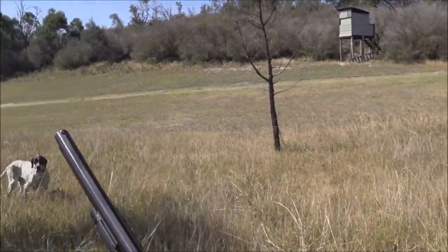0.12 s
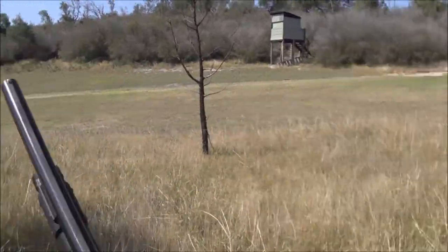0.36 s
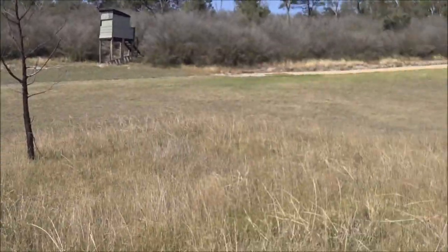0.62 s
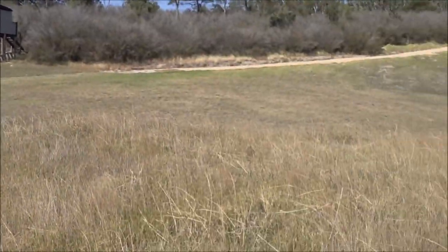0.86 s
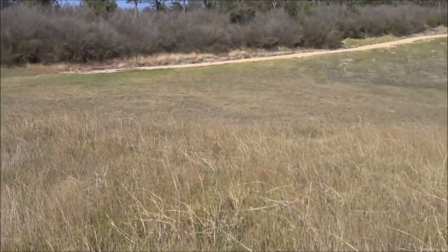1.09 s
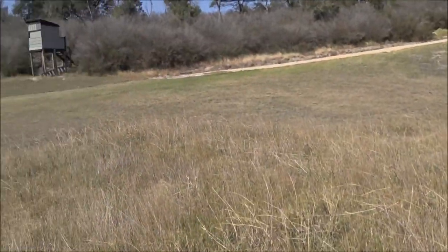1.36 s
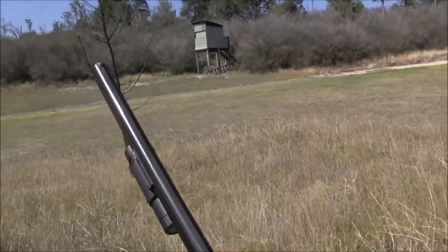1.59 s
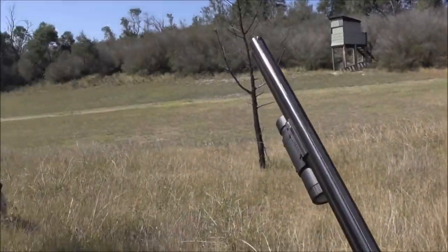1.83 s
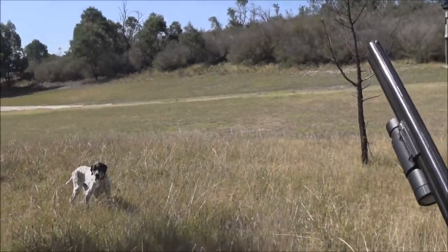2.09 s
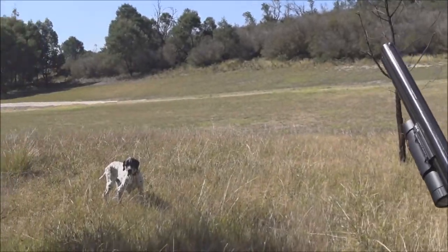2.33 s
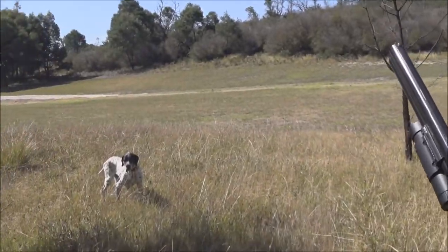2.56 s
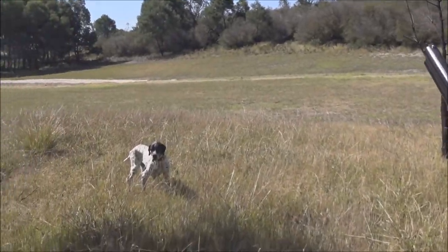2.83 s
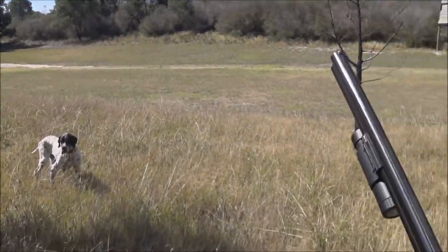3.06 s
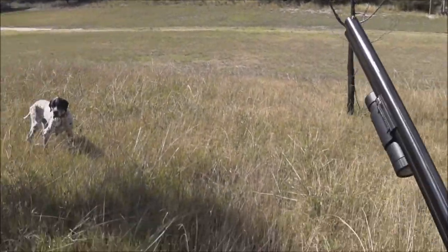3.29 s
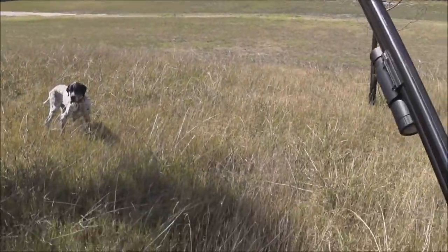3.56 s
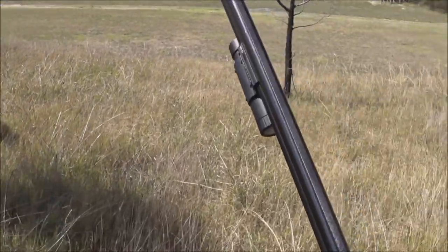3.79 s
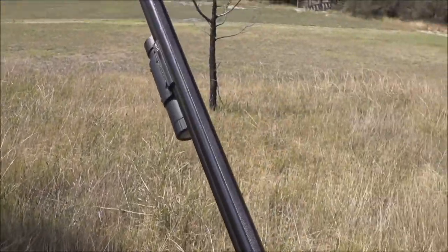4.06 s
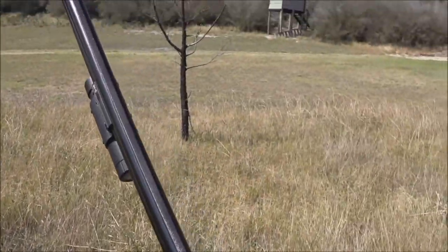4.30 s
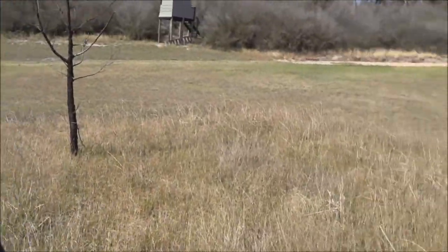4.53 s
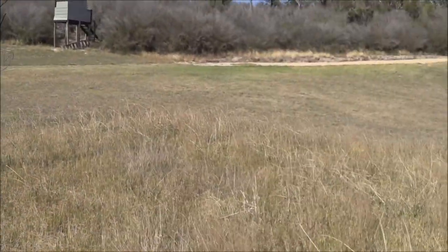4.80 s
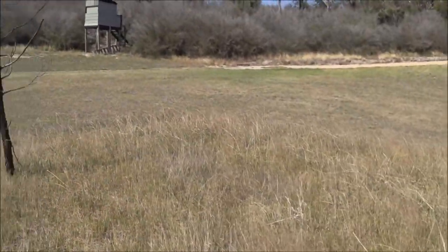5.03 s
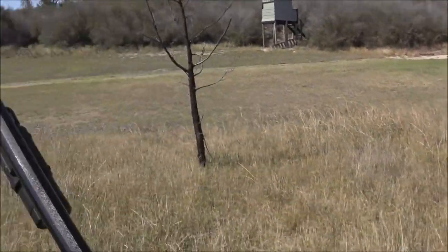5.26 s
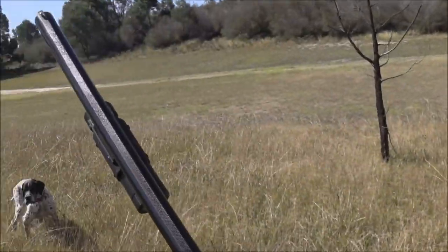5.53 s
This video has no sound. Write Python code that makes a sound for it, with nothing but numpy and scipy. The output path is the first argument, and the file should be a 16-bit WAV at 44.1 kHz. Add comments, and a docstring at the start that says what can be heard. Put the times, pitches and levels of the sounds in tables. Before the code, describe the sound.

Uneven dry grass rustling outdoors, loud low wind thumps near the start, a weaker gust later, thin insect trills and a sharp twig-like click.

```python
"""Legs brush through tall dry grass on a breezy hillside, heard by a head-worn stereo camera.
The grass is filtered noise and tiny clicks, over the steady low noise of the microphone capsules.
Wind thumps on two ports are summed wave packets and deep noise; stalks pop as single wave packets.
Trains of high insect chirps are gated tones, stem snaps are noise bursts rung through resonances,
and one brief faint hum is a sine."""
import sys
import numpy as np
from scipy import signal
from scipy.fft import rfft, irfft, next_fast_len
from scipy.io import wavfile
from scipy.ndimage import uniform_filter1d, minimum_filter1d, map_coordinates

SR = 44100
rng = np.random.default_rng(int(sys.argv[2]) if len(sys.argv) > 2 else 0)


def invert_db(level):
    """Linear amplitude ratio for a level in decibels (20 dB per decade), elementwise."""
    return 10 ** (np.asarray(level, dtype=float) / 20)


def pcm_store(signal):
    """Save signal as 16-bit PCM."""
    levels = np.round(np.clip(np.atleast_2d(signal), -1, 1) * 32767)
    wavfile.write(sys.argv[1], SR, levels.astype(np.int16).T)


N = 248724


def unit(x):
    """Normalisation: scales a signal to an rms of 1."""
    return x / np.sqrt(np.mean(x ** 2) + 1e-20)


def along(points, hz):
    """Spectral interpolation: reads (frequency, value) points on a logarithmic frequency axis."""
    point_hz, value = np.transpose(points)
    return np.interp(np.log(hz + 1), np.log(point_hz + 1), value)


def curves(rows):
    """Linear interpolation in time: one curve for each column after the time."""
    s, *columns = np.transpose(rows)
    return [np.interp(np.arange(N) / SR, s, column) for column in columns]


def wobble(rate):
    """Slow random modulation: a smooth curve through `rate` random knots a second."""
    knots = rng.standard_normal(int(N * rate / SR) + 4)
    return map_coordinates(knots, [np.arange(N) * rate / SR])


def filtered(x, response):
    """Linear filtering: the spectrum of x is multiplied by a response of frequency."""
    m = next_fast_len(N + 8192)
    return irfft(rfft(x, m) * response(np.fft.rfftfreq(m, 1 / SR)), m)[..., :N]


def wavelets(s, gain, hz, cycles, phase):
    """Superposition of short wave packets centred on times s; each rises faster than it fades."""
    k = np.arange(-300, 501)
    turns = hz[:, None] * k / SR
    span = np.where(k < 0, 0.54 * cycles, cycles)
    carrier = np.cos(2 * np.pi * turns + phase[:, None])
    wave = gain[:, None] * carrier / (1 + (turns / span) ** 2) ** 2
    wave *= signal.windows.tukey(len(k), .4)
    at = np.clip(np.round(s * SR).astype(int)[:, None] + k, 0, N)
    return np.bincount(at.ravel(), wave.ravel(), N + 1)[:N]


# left-right correlation of the brushing: (frequency [Hz], correlation [1])
BRUSH_CORRELATION = [(60, 0.63), (150, 0.17), (380, 0.66), (950, 0.52), (2380, 0.41), (5980, 0.74),
                     (15000, 0.54)]


def brush(spectrum, per_s, spread_db, grain_share, patchy_db):
    """Friction noise: patchy noise plus tiny stem clicks of very uneven size, in stereo at rms 1."""
    z = signal.stft(rng.standard_normal((2, N)), nperseg=256)[2]
    field = uniform_filter1d(rng.standard_normal(z.shape[1:]), 5, 0)
    field = uniform_filter1d(field, 12, 1)
    noise = unit(signal.istft(z * invert_db(patchy_db * unit(field)), nperseg=256)[1][:, :N])
    hit = rng.random(N) < per_s / SR
    size = invert_db(spread_db * np.minimum(rng.exponential(size=N), 2.8))
    clicks = unit(hit * size * rng.standard_normal((2, N)))
    share = np.clip(grain_share, 0, 1)
    pair = np.sqrt(1 - share) * noise + np.sqrt(share) * clicks

    def mid_side_response(hz):
        # this mid/side angle gives left and right the tabled correlation
        angle = np.arccos(np.clip(along(BRUSH_CORRELATION, hz), -1, 1)) / 2
        low_cut = np.minimum(1, hz / spectrum[0][0]) ** 3
        return invert_db(along(spectrum, hz)) * low_cut * [np.cos(angle), np.sin(angle)]

    mid, side = filtered(pair, mid_side_response)
    return unit(np.array([mid + side, mid - side]))


# legs through the grass: (time [s], stem contact level [dB], seed heads relative to stems [dB],
# low blades relative to stems [dB])
STRIDES = [(0, -55.5, -7, -4), (.04, -50.5, -3, -5), (.17, -47.5, -4.5, -6.5), (.32, -54.5, -4, -0.5),
           (.6, -57.5, 0, 1.5), (.74, -57, -3, -1), (.83, -53.5, -1, -2.5), (1.07, -45, -4.5, -5.5),
           (1.33, -52.5, -1, 1.5), (1.41, -58.5, -4, 2.5), (1.57, -55.5, -5, -1), (1.63, -52, 1, 0.5),
           (1.69, -54, -1, -1.5), (2.2, -47, -3.5, -4), (2.33, -45.5, -1.5, -5.5), (2.44, -45.5, -3, -7),
           (2.5, -53.5, -2, -4), (2.7, -58.5, -4, -0.5), (2.8, -52, -4, -3.5), (2.87, -55, -3.5, -1.5),
           (3.28, -56, -0.5, 0.5), (3.49, -44, 1.5, -7.5), (3.63, -48, -0.5, -3.5), (3.75, -55, -6, -3),
           (4.11, -57, -1.5, 0.5), (4.3, -52.5, -6, -7), (4.38, -59.5, 4, 2.5), (4.43, -52.5, 1.5, -3),
           (4.63, -47, -1, -5.5), (4.71, -50.5, 0, -7), (4.85, -48, 2, -6.5), (4.96, -52.5, 1, -6.5),
           (5.12, -59, 1.5, -1), (5.31, -52.5, -2, -3.5), (5.51, -58.5, -0.5, 2.5), (5.64, -55.5, -2, 4.5)]
# relative spectra of stems, low blades and seed heads: (frequency [Hz], density [dB per Hz])
STEM_SPECTRUM = [(1760, -23), (3000, -13.5), (4250, -10.5), (4560, -8.5), (7330, -2), (10300, -6.5),
                 (12000, -22), (15600, -75), (22000, -120)]
BLADE_SPECTRUM = [(59, -47), (100, -22), (205, -31.5), (320, -13.5), (413, -13.5), (484, -9.5), (806, -5.5),
                  (1700, -4.5), (2340, -5.5), (3660, -9.5), (4500, -10), (5850, -17), (9900, -120)]
SEED_HEAD_SPECTRUM = [(6180, -11), (10500, 0), (11700, 0.5), (15100, 3), (15800, -0.5)]
CRUNCH_DB = 5  # extra low crush underfoot


def grass():
    """Sliding friction: stems, blades and seed heads brush the legs in uneven clumps of contact."""
    stems_db, heads_db, blades_db = curves(STRIDES)
    clump = wobble(24.13)
    swish_db = stems_db + 1.2 * clump + .6 * wobble(9)
    swish = invert_db(swish_db) * brush(STEM_SPECTRUM, 2500, 3, .22, 1.3)
    rustle = brush(BLADE_SPECTRUM, 500, 1.8, 0.23, 1.0)
    crunch = filtered(rustle, lambda hz: 1 / (1 + (hz / 1200) ** 4))  # matted grass crushed under the sole
    rustle_db = stems_db + blades_db + .5 * clump + 0.89 * wobble(15)
    rustle = invert_db(rustle_db) * (rustle + (invert_db(CRUNCH_DB) - 1) * crunch)
    hiss_db = stems_db + heads_db + 0.67 * clump + 1.4 * wobble(41)
    hiss = invert_db(hiss_db) * brush(SEED_HEAD_SPECTRUM, 2500, 1.8, 0.24, 1.0)
    return (swish + rustle + hiss) * invert_db([[.6], [-.6]])  # slightly to the left


# relative spectrum of the capsules' low noise: (frequency [Hz], density [dB per Hz])
CAPSULE_SPECTRUM = [(15, -9), (40, -11), (80, -1.5), (130, -11), (260, 1), (400, -10), (800, -60)]


def capsule_noise():
    """Stationary noise: steady low noise of the microphone capsules, partly shared by the channels."""
    noise = filtered(rng.standard_normal((2, N)), lambda hz: invert_db(along(CAPSULE_SPECTRUM, hz)))
    return invert_db(-75.5) * unit(noise + noise[::-1] * .4)


# gusts: (start [s], end [s], airflow over the ports [dB], deep rumble [dB])
GUSTS = [(0, .13, -62, -64), (.687, .778, -31, -49.5), (.802, .955, -29.5, -42.5),
         (.96, 1.045, -32.5, -40.5), (1.055, 1.178, -28, -39), (1.195, 1.295, -28, -42.5),
         (1.31, 1.4, -28, -41.5), (1.43, 1.55, -33.5, -45.5), (1.563, 1.62, -27.5, -53),
         (1.65, 1.82, -49, -52.5), (2.02, 2.28, -61, -69), (2.5, 2.95, -71.5, -69),
         (3.14, 3.41, -64.5, -69), (3.55, 3.9, -66, -72), (3.92, 4.1, -53, -69), (4.17, 4.37, -58.5, -77),
         (4.63, 4.77, -48.5, -61), (4.785, 5.1, -42, -48.5), (5.15, 5.2, -59, -59),
         (5.24, 5.33, -53.5, -50), (5.37, 5.44, -53.5, -55), (5.56, 5.7, -56, -71)]
GUST_RISE_DB_PER_S, GUST_FALL_DB_PER_S, CALM_DB = 2500, 800, -95
# puff of air dragged along by a strong eddy; its rumble follows the eddy's level in dB
PUFF_S, PUFF_FLOW_DB, PUFF_RUMBLE_DB, PUFF_RUMBLE_FOLLOWS = 0.018, -20, -48, 0.33


def airflow():
    """Gust envelopes: flow and rumble in dB rise fast and fall slower; strong eddies add short puffs."""
    t = np.arange(0, N, 64)[:, None] / SR
    s, db, _ = np.transpose(EDDIES)
    puff_rumble_db = PUFF_RUMBLE_DB + PUFF_RUMBLE_FOLLOWS * db
    puffs = np.transpose([s - PUFF_S / 2, s + PUFF_S / 2, db + PUFF_FLOW_DB, puff_rumble_db])
    start, end, *levels = np.transpose(np.vstack([GUSTS, puffs]))
    away_db = GUST_RISE_DB_PER_S * np.maximum(start - t, 0) + GUST_FALL_DB_PER_S * np.maximum(t - end, 0)
    loudest = [np.maximum((db - away_db).max(axis=1), CALM_DB) for db in levels]
    return [np.interp(np.arange(N) / SR, t[:, 0], db) for db in loudest]


# colour of the port cavity for wind: (frequency [Hz], gain [dB])
PORT_GAIN = [(15, -47), (50, -8.5), (150, -1.5), (800, 4), (1400, 5), (2200, 0), (3500, -38)]


def through_port(x):
    """Cavity response: the port colours the wind pressure acting on it."""
    return filtered(x, lambda hz: invert_db(along(PORT_GAIN, hz)))


def small_eddies(flow_db):
    """Turbulence at one port: random wave packets follow the flow; faster air makes them higher."""
    draw = rng.random((2400, 4))
    level_db = flow_db[(draw[:, 0] * N).astype(int)]
    hz = 350 * invert_db(0.27 * (level_db + 35.5) + 12.4 * (draw[:, 1] - .5))
    size = invert_db(level_db - 8.5 + 17.5 * draw[:, 2] ** 1.45)
    return wavelets(draw[:, 0] * N / SR, size, hz, 0.91, 2 * np.pi * draw[:, 3])


# relative spectrum of the deep rumble: (frequency [Hz], density [dB per Hz])
RUMBLE_SPECTRUM = [(15, -47), (30, -26), (50, -10), (80, -6), (130, -0.5), (220, -7), (400, -33)]


def deep_rumble(rumble_db):
    """Low-frequency turbulence: lumpy noise, partly common because large eddies press on both ports."""
    lumps = invert_db(1.53 * wobble(20) + 3.2 * np.array([wobble(18), wobble(23)]))
    deep = filtered(rng.standard_normal((2, N)), lambda hz: invert_db(along(RUMBLE_SPECTRUM, hz)))
    deep += 0.28 * deep[::-1]
    return invert_db(rumble_db) * unit(lumps * deep)


# strongest eddies before break-up: (time [s], nominal side level [dB], mid relative to side [dB])
EDDIES = [(.061, -39.5, -1), (.095, -43, -2), (.688, -23, -5), (.704, -9.5, -7), (0.731, -20.5, 0),
          (.748, -14.5, -4.5), (0.767, -12, -4), (0.802, -12.5, -3), (0.842, -10, -7.5), (.868, -6.5, -7.5),
          (.911, -12.5, -5.5), (.929, -3.5, -6), (1.061, -3.5, -8), (1.086, -9, -6.5), (1.1, -16, -6),
          (1.115, -6, -9), (1.153, -12, -11), (1.175, -9.5, -16), (1.241, -7, -6), (1.259, -10.5, -16),
          (1.286, -10, -12.5), (1.31, -16.5, 0), (1.33, -10, -9), (1.37, -10.5, -11), (1.387, -13, -9),
          (1.417, -15, -10), (1.478, -15.5, -8), (1.528, -18.5, -5), (1.568, -5.5, -9), (1.581, -6.5, -7.5),
          (1.603, -4.5, -7), (1.725, -33, -1), (1.749, -28.5, -3), (1.774, -23.5, -6), (2.03, -45, -13),
          (2.124, -32, -3.5), (2.145, -39, -7), (2.178, -38, -10), (2.198, -38, -3), (3.031, -33, -1.5),
          (3.172, -40, -9), (3.219, -33.5, -5), (3.336, -28, -7), (3.362, -35, -2), (3.653, -28.5, -4),
          (3.663, -42, -5), (3.926, -42.5, 2.5), (3.994, -35.5, -0.5), (4.024, -34, -6), (4.037, -34.5, -2),
          (4.063, -46, 2), (4.19, -43, 0), (4.255, -40.5, 1), (4.364, -42.5, 2.5), (4.655, -35, -3),
          (4.698, -18, -7), (4.707, -14.5, -10.5), (4.759, -22.5, -5), (4.835, -18, -3.5),
          (4.874, -19.5, -5), (4.91, -21, -3.5), (4.942, -29, -4), (4.977, -13.5, -9.5), (5.011, -20.5, -2),
          (5.022, -21.5, -0.5), (5.032, -23, -2), (5.088, -27.5, -7.5), (5.16, -42, 4), (5.254, -38, 2),
          (5.285, -34.5, 3.5), (5.301, -29.5, -2), (5.393, -35, 0.5), (5.414, -50, -11), (5.48, -45, -1),
          (5.618, -42, 5.5)]
# break-up of a strong eddy: (nominal delay [cycles], nominal relative level [dB], nominal pitch ratio [1])
SWIRLS = [(0, -2, 0.84), (.3, -14.5, 1.5), (1.8, -5.5, 1.2), (3.6, -15, 2.3)]
EDDY_HZ, EDDY_LOWEST_HZ = 738.5, 318  # pitch at 0 dB and its floor, before scatter
EDDY_RISE, EDDY_SCATTER_DB = 0.217, 2.5  # dB of pitch per dB of level, full width of the pitch scatter


def strong_eddies():
    """Vortex break-up: mid and side of big eddies, stronger ones higher, each split into swirls."""
    s, side_db, below_db = np.transpose(EDDIES)
    scatter = invert_db(EDDY_SCATTER_DB * (rng.random(len(s)) - .5))
    hz = np.maximum(EDDY_HZ * invert_db(EDDY_RISE * side_db), EDDY_LOWEST_HZ) * scatter
    out = np.zeros((2, N))
    for late_cycles, swirl_db, ratio in SWIRLS:
        draw = rng.random((len(s), 4))
        at = s + late_cycles * (0.741 + 0.576 * draw[:, 2]) / hz
        # only delayed swirls scatter further in pitch
        pitch = ratio * hz * invert_db(np.sign(late_cycles) * 8.0 * (draw[:, 3] - .5))
        mid_gain = invert_db(side_db + below_db + 1.384 * swirl_db)
        out[0] += wavelets(at, mid_gain, .85 * pitch, 0.62, 2 * np.pi * draw[:, 0])
        out[1] += wavelets(at, invert_db(side_db + swirl_db), pitch, 0.99, 2 * np.pi * draw[:, 1])
    return out


# gain the camera puts on the difference of its ports: (frequency [Hz], side gain [dB])
SIDE_GAIN = [(30, -12), (70, -8), (150, 0.5), (250, 4.5), (400, 5), (800, 7.5), (1400, 4.5), (2500, -5.5)]


def wind():
    """Local pressure fluctuation: each port has its own eddies; the camera reshapes their difference."""
    flow_db, rumble_db = airflow()
    ports = through_port(np.array([small_eddies(flow_db) for _ in range(2)]))
    ports += deep_rumble(rumble_db)
    mid = (ports[0] + ports[1]) / 2
    side = filtered((ports[0] - ports[1]) / 2, lambda hz: invert_db(along(SIDE_GAIN, hz)))
    mid, side = [mid, side] + through_port(strong_eddies())
    return np.array([mid + side, mid - side])


# stalks popping underfoot: (time [s], packet level before bass loss [dB], pitch [Hz])
POPS = [(0.028, -38, 740), (0.135, -37, 990), (0.161, -45, 735), (0.215, -36.5, 1080), (0.241, -57, 813),
        (0.608, -40.5, 790), (2.042, -39, 980), (2.079, -38.5, 696), (2.099, -41, 856), (2.113, -36, 759),
        (2.261, -35, 820), (3.225, -33.5, 695), (3.963, -43, 874), (4.465, -39, 680), (4.557, -36.5, 730)]


def stalk_pops():
    """Impulsive radiation: each stalk gives one short wave packet, and small sources radiate little bass."""
    s, db, hz = np.transpose(POPS)
    pops = wavelets(s + 0.0018, invert_db(db), hz, 1.0, 2 * np.pi * rng.random(len(s)))
    return filtered(pops, lambda f: 1 / (1 + (350 / (f + 1)) ** 4))


# insect trains: (first chirp [s], last chirp [s], nominal level before panning [dB])
TRAINS = [(0.17, .4424, -51), (1.27, 1.454, -45), (2.016, 2.562, -47), (3.207, 3.945, -44),
          (4.675, 5.2365, -42), (5.6057, 5.698, -42.5)]
CHIRP_HZ, CHIRP_GAP_S = 8365, .0923  # nominal pitch and spacing
SWELL_DB, SWELL_HZ = 5, 150  # a train starts and ends softer and starts lower


def insect():
    """Stridulation: evenly spaced 20 ms wing strokes, each a tone whose pitch sags at the end."""
    out, t = np.zeros(N + SR), np.arange(2048) / SR
    stroke = np.clip(np.minimum(t / 0.0024, (.02 - t) / 0.011), 0, 1)
    sag_hz = 300 * np.clip((t - .01) / 0.0038, 0, 1)
    for first, last, db in TRAINS:
        for u in np.linspace(0, 1, round((last - first) / CHIRP_GAP_S) + 1):
            edge = (2 * u - 1) ** 4  # 1 at either end of the train
            teeth = invert_db(0.5 * np.repeat(rng.standard_normal(32), 64))  # uneven teeth of the file
            hz = CHIRP_HZ - SWELL_HZ * edge * (1 - u) + rng.normal(0, 38) - sag_hz
            gain = invert_db(db - SWELL_DB * edge + rng.normal(0, 1))
            chirp = gain * stroke * teeth * np.sin(2 * np.pi * np.cumsum(hz) / SR)
            out[round((first + u * (last - first)) * SR):][:2048] += chirp
    return out[:N] * invert_db([[2.5], [-2.5]])  # to the left


def resonance(x, hz, width):
    """Second-order resonance: a band-pass response centred on hz, width in Hz."""
    f = np.fft.rfftfreq(len(x), 1 / SR)
    return irfft(rfft(x) * 1j * f * width / (hz * hz - f * f + 1j * f * width))


# stems breaking: (time [s], crack peak before panning [dB], crack centre [Hz], body relative to crack [dB])
SNAPS = [(.183, -30, 6500, -6), (.2144, -29, 7450, -5), (.2505, -32, 8200, -5), (.3572, -29, 7400, -14),
         (.6076, -37, 2460, -6), (.9672, -32, 7090, -12), (1.202, -33, 8030, -10), (1.297, -33, 9880, -12),
         (1.6043, -36, 12500, -8), (1.6315, -28, 9390, -20), (2.2164, -31, 9000, -10),
         (2.9522, -39, 4690, -14), (3.4508, -24, 7800, -12), (3.6093, -18, 8200, -9),
         (3.9628, -38, 4000, -1), (4.4084, -36, 8500, -8)]
SNAP_PAN_DB = 1.5  # left over right


def stem_snaps():
    """Brittle fracture: a sharp resonant crack over a duller body, with a short rattle."""
    out, t = np.zeros((2, N + 2048)), np.arange(2048) / SR
    peak = lambda x: x / np.abs(x).max()
    decay = invert_db(-60 * t / .002) + .2 * invert_db(-60 * t / .018)  # the slower part is the rattle
    for s, db, hz, body_db in SNAPS:
        burst = rng.standard_normal((2, 2048)) * decay
        crack = peak(resonance(resonance(burst[0], hz, .9 * hz), hz, .9 * hz))
        body = peak(resonance(burst[1], 2500, 2400))
        snap = invert_db(db) * (crack + invert_db(body_db) * body)
        out[:, round((s + .001) * SR):][:, :2048] += snap * invert_db([[SNAP_PAN_DB / 2], [-SNAP_PAN_DB / 2]])
    return out[:, :N]


# the one low tone: (pitch [Hz], rms level [dB])
HUM = (260, -64.5)
# when it sounds: (start [s], end [s])
HUM_SPAN = (4.39, 4.62)


def hum():
    """Pure tone: a faint steady low sine, briefly gated on."""
    (start, end), (hz, db) = HUM_SPAN, HUM
    t = np.arange(N) / SR
    gate = np.clip(np.minimum(t - start, end - t) / 0.012, 0, 1)
    return np.sqrt(2) * gate * invert_db(db) * np.sin(2 * np.pi * hz * t)


def scene():
    """Superposition in a free field: the layers add and no walls answer."""
    return grass() + capsule_noise() + wind() + stalk_pops() + insect() + stem_snaps() + hum()


# upper band limit: (frequency [Hz], gain [dB])
BAND_EDGE = [(15800, 0), (15900, -50)]


def band_limited(x):
    """Low-pass filtering: little is kept above the band edge."""
    return filtered(x, lambda hz: invert_db(along(BAND_EDGE, hz)))


def roll_off(x):
    """The treble ends steeply here."""
    return signal.sosfilt(signal.butter(12, 16980, fs=SR, output="sos"), x)


def record(dry):
    """Peak limiting: a fast gain holds down the thumps before the band is limited."""
    need = np.minimum(1, .88 / (np.abs(dry).max(axis=0) + 1e-9))
    gain = minimum_filter1d(need, size=161)  # reaches ahead of each peak
    gain = uniform_filter1d(uniform_filter1d(gain, size=81), size=81)
    mix = band_limited(dry * gain)
    return roll_off(mix)


dry = scene()
out = record(dry)
pcm_store(out)
```